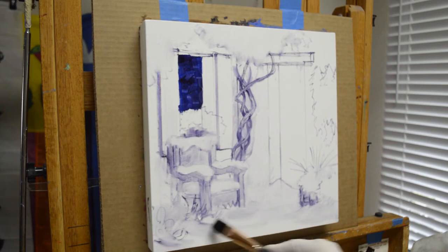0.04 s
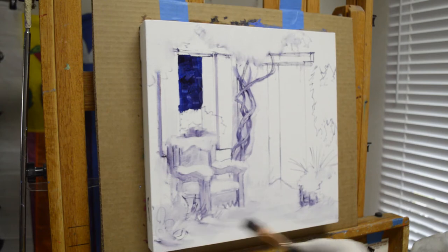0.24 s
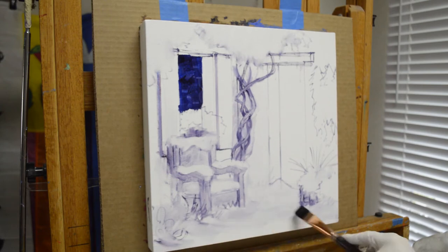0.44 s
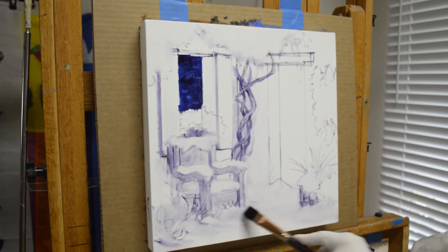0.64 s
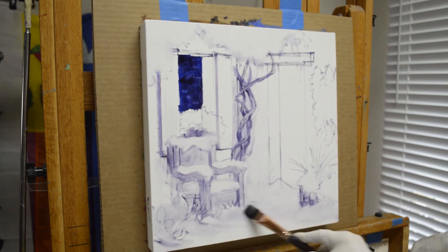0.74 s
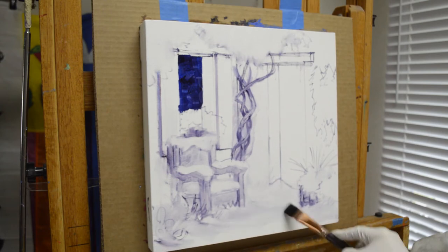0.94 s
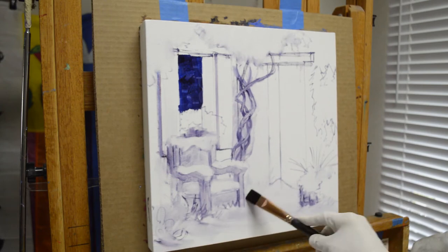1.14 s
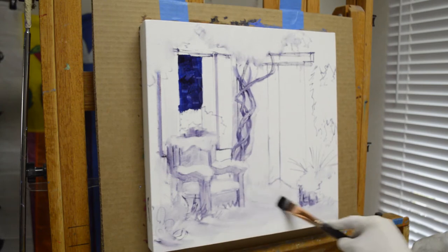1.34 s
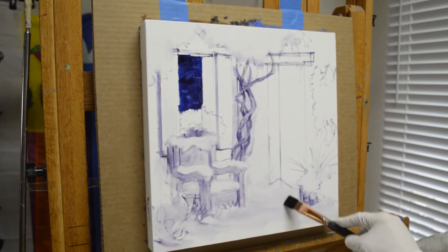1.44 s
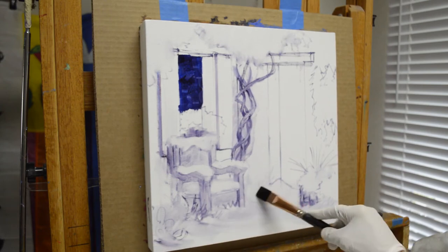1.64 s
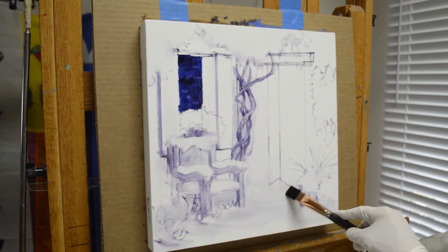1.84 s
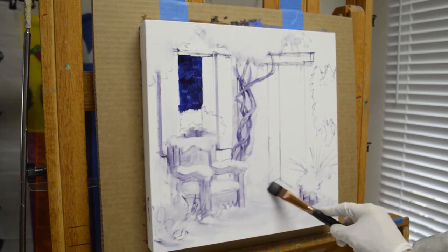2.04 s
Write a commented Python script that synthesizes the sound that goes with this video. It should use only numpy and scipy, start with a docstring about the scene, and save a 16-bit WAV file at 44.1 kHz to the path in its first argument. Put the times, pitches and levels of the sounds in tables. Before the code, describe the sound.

A paintbrush scrubs a canvas in four short, scratchy strokes with light taps between.

```python
"""A flat bristle brush scrubs to and fro on a stretched canvas: four strokes that swell and fade.
Its bristles flick over the threads, hissing and making the canvas ring with a rasp.
Around the strokes the brush drags and taps, the canvas drums and its frame bumps the easel.
Behind it is a small, quiet studio with mains hum and a thin electrical whine, heard in mono."""
import sys
import numpy as np
from scipy import signal
from scipy.fft import rfft, irfft, next_fast_len
from scipy.io import wavfile
from scipy.ndimage import map_coordinates

SR = 44100
rng = np.random.default_rng(int(sys.argv[2]) if len(sys.argv) > 2 else 0)


def output_pcm(signal):
    """Save a mono or channel-first signal as 16-bit PCM at the path in sys.argv[1].

    Samples are clipped to [-1, 1] before scaling.
    """
    pcm = np.clip(np.atleast_2d(signal).T, -1, 1) * 32767
    wavfile.write(sys.argv[1], SR, np.round(pcm).astype(np.int16))


N = 92610  # 2.1 seconds

# Tone of the room's steady noise (frequency [Hz], relative level [dB])
AIR_SPECTRUM = [(20, -23), (50, 0), (120, -2.5), (200, -0.5), (400, 1), (600, 1.5), (1200, -0.5),
                (2200, -3.5), (3500, -7.5), (6000, -9.5), (10000, -11.5), (13000, -16.5), (15500, -9.5)]
# Tones of the hum (frequency [Hz], level [dB])
HUM_TONES = [(59.3, -74.5), (88, -78.5), (118.5, -68.5)]
# How long the room echoes (frequency [Hz], time to fade by 60 dB [s])
ECHO_TIMES = [(150, 0.33), (1000, 0.3), (5000, 0.16), (14000, 0.17)]
# The frame bumps the easel (time [s], level [dB])
FRAME_BUMPS = [(.752, -44.5), (1.206, -48), (1.921, -42.5)]
# Tones of the bumped frame (frequency [Hz], relative level [dB], time to fade by 60 dB [s])
FRAME_TONES = [(127, -7, 0.25), (189, -3.5, .12), (217, 0, 0.059)]
# The canvas drums under the brush (time [s], level [dB], half length [s])
DRUM_PULSES = [(0.253, -58, 0.031), (1.747, -53, 0.032)]
# Strong ringing tones of the canvas (frequency [Hz], width [Hz], relative level [dB])
CANVAS_TONES = [(582.5, 7.7, -2.5), (619, 26, -2.5), (802, 8.8, 0.5), (856, 20, -2), (907, 23, -3),
                (953, 21, -15), (1078, 48, -4.5), (1308, 25, -0.5), (1337.4, 16, 0.5), (1514, 33, -3.5),
                (1620, 30, -7), (1755.5, 35, -0.5), (1903, 68, -6), (2165, 47, -6.5), (2425, 17, -9)]
# Its many weaker tones, blurred into a wash (frequency [Hz], relative level [dB])
WASH_SPECTRUM = [(100, -27), (250, -17), (430, -19.5), (560, 3), (900, 3), (1400, -2.5), (2000, -2.5),
                 (2700, -16), (5000, -28.5)]
# Tone of the bristles' hiss (frequency [Hz], relative level [dB])
BRISTLE_SPECTRUM = [(800, -23.5), (2000, -6.5), (3000, -2), (4500, -2.5), (6000, -1), (8000, -0.5),
                    (9500, 2.5), (10600, 2.5), (12000, -5), (13500, -12.5), (15500, -9.5)]
# The brush taps the canvas
# (time [s], canvas ring [dB], bristle crunch [dB], time to fade by 30 dB [s], brightness [dB/octave])
BRUSH_TAPS = [(.001, -47.5, -57, 0.047, 3), (1.003, -41.5, -47.5, 0.022, -6), (1.51, -42.5, -45, .035, -7),
              (1.918, -36, -41.5, 0.055, -4.5), (2.062, -43, -53, 0.031, -1)]
# The bristle tips drag lightly as the brush turns (time [s], hiss level [dB], half length [s])
TIP_DRAGS = [(0.477, -50.5, 0.053), (1.007, -57, 0.022), (1.271, -56, 0.033), (1.469, -55.5, 0.047),
             (1.964, -63, .05)]
# The brush strokes (fastest moment [s], hiss level [dB], rise [dB/s], fall [dB/s],
# grip start [s], grip end [s], rasp level [dB], pitch this spot of canvas favours [Hz])
BRUSH_STROKES = [(0.354, -31, 215, 205, 0.28, 0.39, -34.5, 1050),
                 (.908, -40.5, 220, 212, 0.85, 0.96, -41.5, 1870),
                 (1.362, -43.5, 280, 199, 1.329, 1.389, -38, 1640),
                 (1.816, -43, 246, 236, 1.776, 1.862, -39.5, 640)]


def amp(db):
    """Turn decibels into a number to multiply a sound by."""
    return 10 ** (np.asarray(db) / 20)


def unit(x):
    """Scale a signal or a filter to an average power of 1."""
    return x / np.sqrt(np.mean(abs(x) ** 2) + 1e-20)


def clock():
    """The time of every sample, in seconds."""
    return np.arange(N) / SR


def along(points, hz):
    """Read between the rows of a (frequency, value) table, with octaves evenly spaced."""
    freqs, values = np.transpose(points)
    return np.interp(np.log(hz + 1), np.log(freqs + 1), values)


def wobble(per_s):
    """A smooth curve through per_s random values a second."""
    return map_coordinates(rng.standard_normal(4096), [clock() * per_s], mode="wrap")


def bell(x, centre, half_width):
    """A soft hill that reaches 1 at its centre."""
    return np.exp(-0.5 * ((x - centre) / half_width) ** 2)


def filtered(x, response):
    """Turn each frequency in x up or down by response(frequency)."""
    size = next_fast_len(N + SR // 2)
    return irfft(rfft(x, size) * response(np.fft.rfftfreq(size, 1 / SR)), size)[..., :N]


def causal(spectrum):
    """A filter with this spectrum that rings only after it is struck, never before."""
    size = next_fast_len(N + SR // 2)
    gains = amp(along(spectrum, np.fft.rfftfreq(size, 1 / SR)))
    cepstrum = irfft(np.log(gains), size)
    cepstrum[1:size // 2] *= 2  # move the part before time zero to after it
    cepstrum[size // 2 + 1:] = 0
    return unit(np.exp(rfft(cepstrum)))


def background():
    """Soft room air, a wavering mains hum and a steady electrical whine."""
    air_db, whine_db, whine_hz = -52.5, -51.5, 15685.6
    t = clock()
    air = unit(filtered(rng.standard_normal(N), lambda f: amp(along(AIR_SPECTRUM, f))))
    hum = sum(amp(db + 2.2 * wobble(7.5)) * unit(np.sin(2 * np.pi * hz * t + 0.8 * wobble(7.3)))
              for hz, db in HUM_TONES)
    whine = unit(np.sin(2 * np.pi * whine_hz * t))
    return amp(air_db + 0.56 * wobble(7.6)) * air + hum + amp(whine_db) * whine


def room_echo(sound):
    """The studio's walls add a short echo, in which high sounds die sooner."""
    hz, t, noise = signal.stft(rng.standard_normal(SR // 2), SR, nperseg=256)
    fade = amp(-60 * t / along(ECHO_TIMES, hz)[:, None])
    tail = signal.istft(noise * fade, SR, nperseg=256)[1]
    delayed = np.pad(sound, (SR // 250, 0))  # 4 ms late
    return signal.fftconvolve(delayed, tail / np.linalg.norm(tail))[:N]


def frame_bumps():
    """The frame knocks softly on the easel and rings with a few low, fading tones."""
    out = np.zeros(N)
    for time, bump_db in FRAME_BUMPS:
        age = np.maximum(clock() - time, 0)
        ring = sum(amp(bump_db + db - 60 * age / fade_s) * np.sin(2 * np.pi * hz * age)
                   for hz, db, fade_s in FRAME_TONES)
        out += (1 - np.exp(-age / 0.0024)) * ring  # a soft start dulls the knock
    return out


def canvas_drumming(hz=116.8):
    """Under the brush, the canvas briefly sounds its lowest note, like a drum skin."""
    loudness = sum(amp(db) * bell(clock(), time, half_s) for time, db, half_s in DRUM_PULSES)
    return loudness * unit(np.sin(2 * np.pi * hz * clock() + 0.33 * wobble(22)))


def canvas_ring(force, brightness=0, wash_db=0.5):
    """A push makes the canvas ring at its strong tones, over a wash of weaker ones."""
    def response(f):
        tones = sum(amp(db) * 1j * f * width / (hz * hz - f * f + 1j * f * width)
                    for hz, width, db in CANVAS_TONES)
        wash = amp(wash_db) * causal(WASH_SPECTRUM)
        tilt = amp(brightness * np.log2(np.clip(f, 500, 3000) / 1000))
        return unit((unit(tones) + wash) * tilt)
    return filtered(force, response)


def flicks(clump_db, spread_db=1.5):
    """Bristles slip off threads: countless tiny clicks of uneven size, coming in clumps."""
    clicks = rng.standard_normal(N) * amp(spread_db * rng.standard_normal(N))
    return unit(clicks * amp(clump_db * wobble(260)))


def spot_flicks(hz, cut_db=2, half_octaves=0.29):
    """Flicks on one spot of the canvas, where pitches far from hz are a little weaker."""
    def response(f):
        closeness = bell(np.log2(f + 1), np.log2(hz), half_octaves)
        return amp(cut_db * (closeness - 1))
    return filtered(flicks(clump_db=1.1), response)


def bristle_hiss(force):
    """The flicking bristles give off a bright hiss of their own."""
    return filtered(force, lambda f: causal(BRISTLE_SPECTRUM))


def brush_taps(rise_s=0.0012, hold_s=0.0027):
    """The brush lands: its bristles buckle in a short crunch that rings the canvas."""
    out = np.zeros(N)
    for time, ring_db, crunch_db, fade_s, brightness in BRUSH_TAPS:
        age = np.maximum(clock() - time, 0)
        fade = amp(-30 * np.maximum(age - hold_s, 0) / fade_s)
        push = (1 - np.exp(-age / rise_s)) * fade
        out += amp(ring_db) * canvas_ring(push * flicks(clump_db=3), brightness)
        out += amp(crunch_db) * bristle_hiss(push * flicks(clump_db=1.5))
    return out


def swell(peak_time, rise, fall, crest_s=0.045):
    """A stroke's level in dB: the brush speeds up, stays briefly near full speed, then slows."""
    offset = clock() - peak_time
    return -np.where(offset < 0, rise, fall) * (np.hypot(offset, crest_s) - crest_s)


def grip(start, end, press_s=0.011, release_s=0.027):
    """The bristles press into the weave, hold, then let go."""
    press = 1 + np.tanh((clock() - start) / press_s / 2)
    release = 1 - np.tanh((clock() - end) / release_s / 2)
    return press * release / 4


def brush_strokes(drag_rasp_db=2.5, glide_rasp_db=-8):
    """The brush's speed drives the hiss; the canvas rasps most where the bristles grip it."""
    drag = np.sqrt(sum((amp(db) * bell(clock(), time, half_s)) ** 2 for time, db, half_s in TIP_DRAGS))
    hiss = drag * flicks(clump_db=1.5)
    rasp = amp(drag_rasp_db) * drag * flicks(clump_db=2.5)
    for time, hiss_db, rise, fall, start, end, rasp_db, spot_hz in BRUSH_STROKES:
        glide = amp(hiss_db + swell(time, rise, fall))
        gripping = amp(rasp_db) * grip(start, end)
        hiss += glide * flicks(clump_db=0.65)
        rasp += np.hypot(gripping, amp(glide_rasp_db) * glide) * spot_flicks(spot_hz)
    pressure = amp(0.54 * wobble(55.04))  # the hand trembles a little
    return bristle_hiss(pressure * hiss) + canvas_ring(pressure * rasp)


def scene(echo_db=-8.5):
    """Brush, canvas and studio together, the same in both channels."""
    brush = brush_strokes() + brush_taps()
    mono = brush + amp(echo_db) * room_echo(brush) + frame_bumps() + canvas_drumming() + background()
    return np.array([mono, mono])


def record(dry, top_hz=15900):
    """Cut away the very highest sounds, above top_hz."""
    return filtered(dry, lambda hz: hz < top_hz)


dry = scene()
out = record(dry)
output_pcm(out)
```